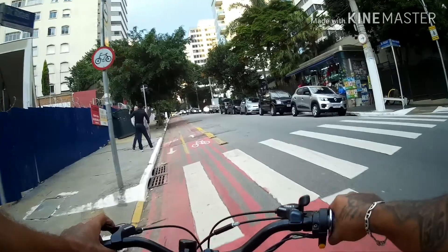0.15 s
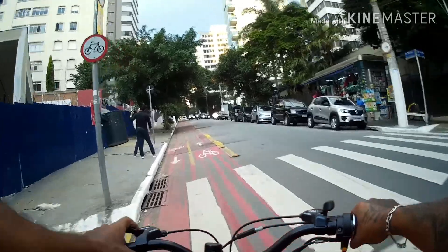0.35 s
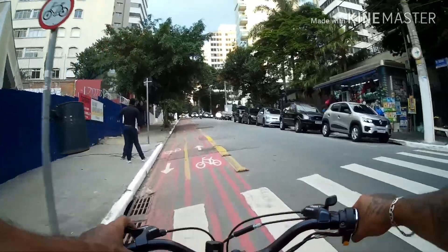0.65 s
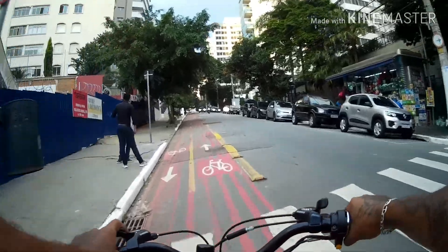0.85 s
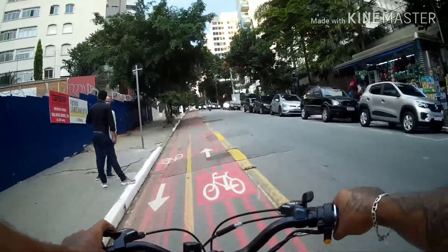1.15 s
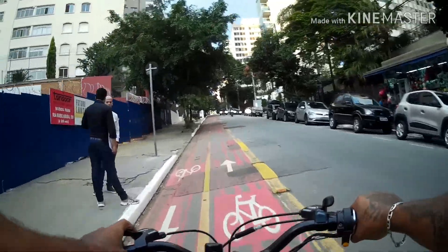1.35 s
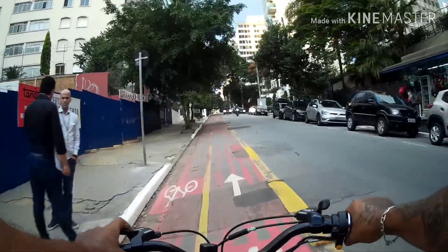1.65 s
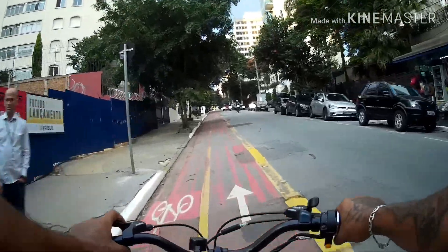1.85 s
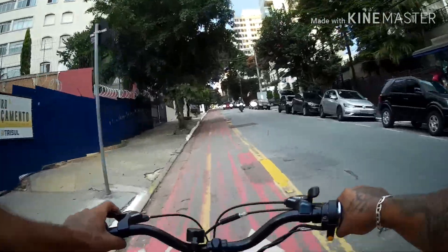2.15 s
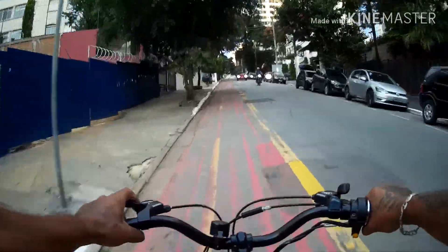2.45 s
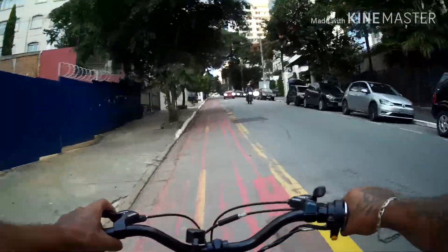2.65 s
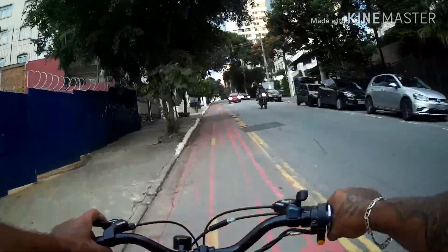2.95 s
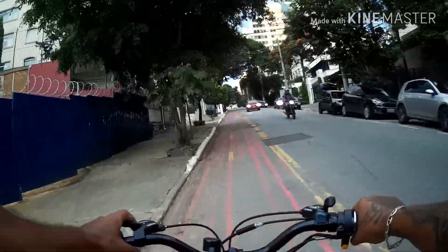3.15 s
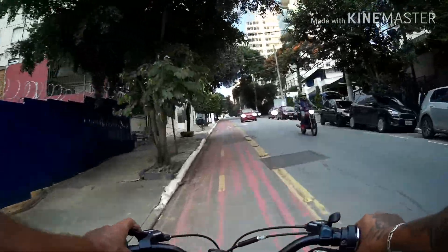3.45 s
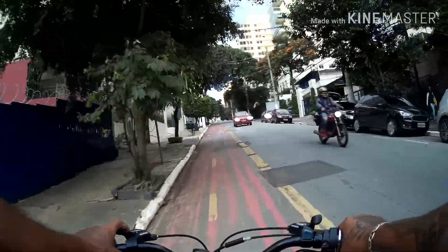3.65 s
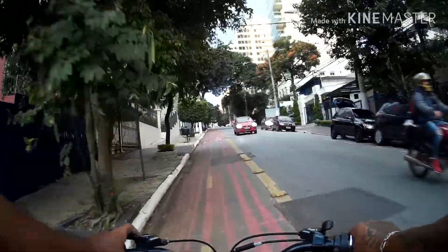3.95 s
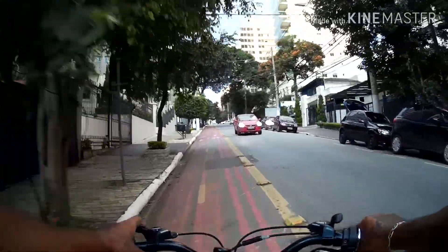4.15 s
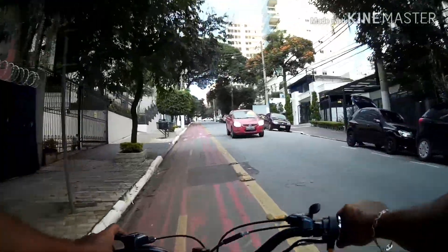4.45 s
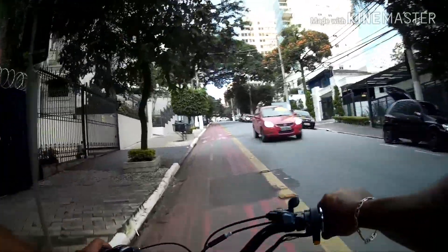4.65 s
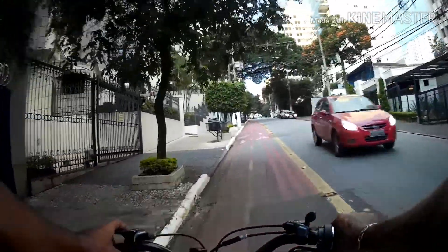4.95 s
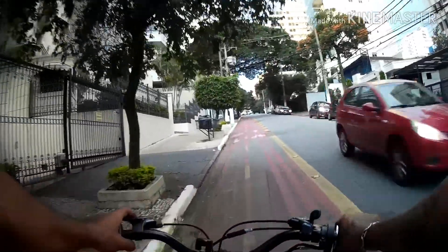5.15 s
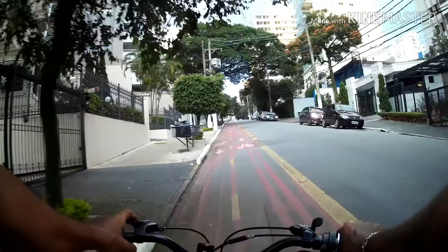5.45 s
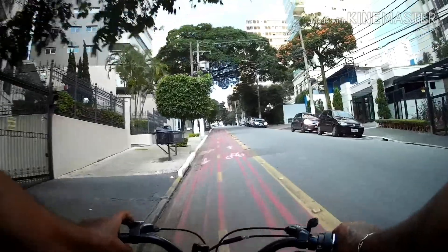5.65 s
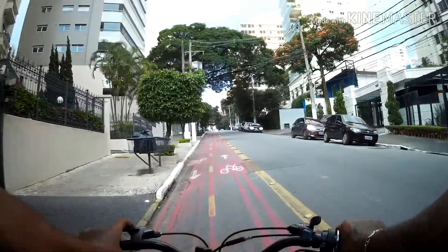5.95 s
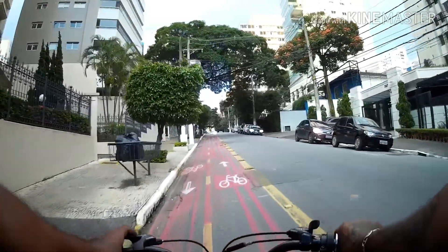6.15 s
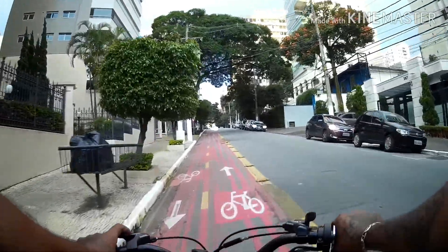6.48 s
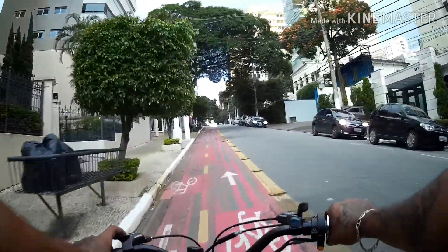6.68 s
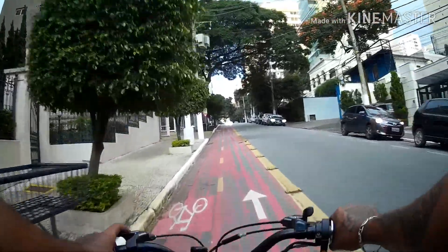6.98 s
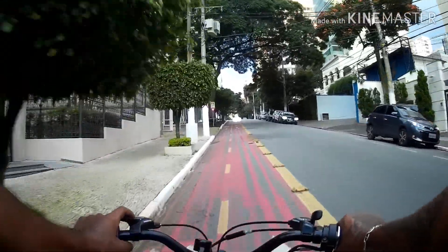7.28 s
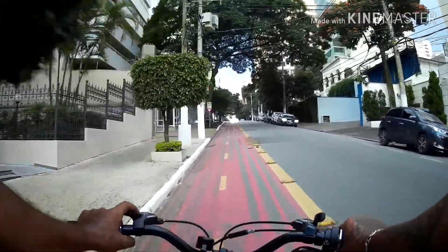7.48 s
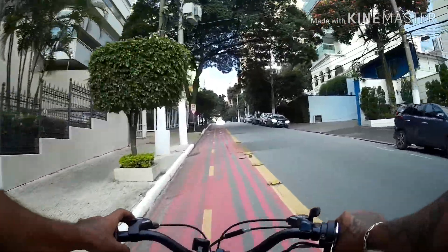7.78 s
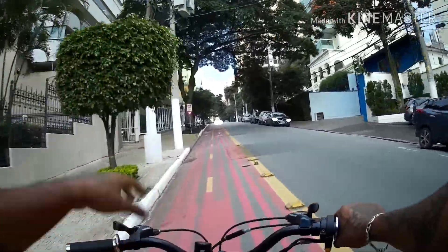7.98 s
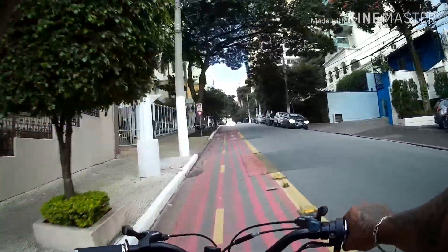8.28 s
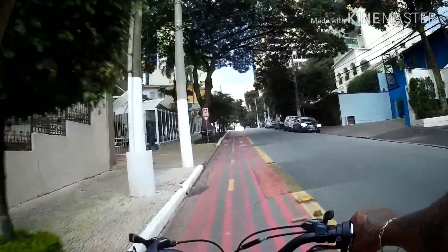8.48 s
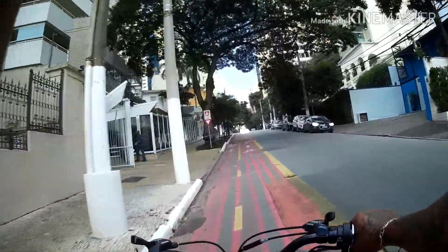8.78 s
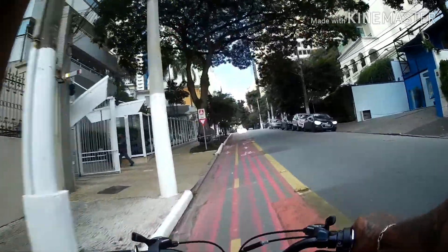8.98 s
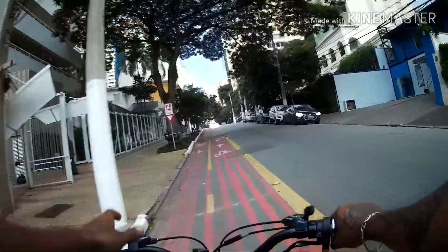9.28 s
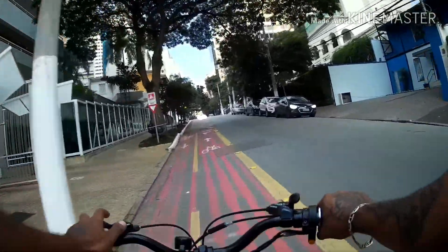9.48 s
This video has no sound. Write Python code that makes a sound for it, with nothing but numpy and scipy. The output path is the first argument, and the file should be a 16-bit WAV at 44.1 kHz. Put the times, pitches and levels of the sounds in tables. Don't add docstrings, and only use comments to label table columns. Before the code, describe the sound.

A small four-stroke engine on a bicycle drones close by, low and throaty with a hollow muffler ring. It speeds up over five seconds, then holds nearly steady. Rough road shakes the chain guard and loose metal in irregular bursts. A motorcycle hums past near four seconds, a car soon after. Wind bumps the single encased microphone, leaving treble dull.

```python
import sys
import numpy as np
from scipy import signal
from scipy.fft import rfft, irfft, next_fast_len
from scipy.io import wavfile
from scipy.ndimage import uniform_filter1d

SR = 44100
rng = np.random.default_rng(int(sys.argv[2]) if len(sys.argv) > 2 else 0)


def generate_wav(sig):
    pcm = np.round(np.clip(np.atleast_2d(sig).T, -1, 1) * 32767).astype(np.int16)
    wavfile.write(sys.argv[1], SR, pcm)


def elevation(decibels):
    levels = np.asarray(decibels, float)
    return 10 ** (levels / 20)


N = 424241


def evened(x):
    return x / np.sqrt(np.mean(x ** 2) + 1e-20)


def steadied(x):
    return x / np.sqrt(uniform_filter1d(x ** 2, size=12000, mode="mirror") + 1e-12)


def curve(rows):
    s, *columns = np.transpose(rows)
    return [np.interp(np.arange(N) / SR, s, column) for column in columns]


def bell(s, length):
    return np.exp(-8 * ((np.arange(N) / SR - s) / length) ** 2)


def gate(turns, place, width):
    from_place = (turns - place + .5) % 1 - .5
    return np.exp(-8 * (from_place / width) ** 2)


def coloured(points):
    f, db = np.transpose(points)
    size = next_fast_len(N)
    hz = np.fft.rfftfreq(size, 1 / SR)
    shape = elevation(np.interp(np.log(hz + 1), np.log(f + 1), db, -90, -90))
    return evened(irfft(rfft(rng.standard_normal(size)) * shape, size)[:N])


def resonate(x, hz, width):
    return signal.lfilter(*signal.iirpeak(hz, hz / width, SR), x)


def engine():
    # (time [s], level [dB])
    effort_rows = [(0.0, -37), (0.02, -35), (0.1, -37.5), (0.27, -34.5), (0.51, -42), (1.12, -41),
                   (1.45, -35), (1.95, -34), (3.51, -32), (3.72, -35), (3.8, -32), (4.88, -31),
                   (5.44, -32.5), (5.63, -29.5), (6.24, -34), (6.54, -30.5), (9.38, -31), (9.62, -30)]
    # (time [s], breathing level [dB])
    throttle = [(0, -34), (.15, -30.5), (.7, -33), (1.3, -32), (2.12, -30.5), (2.6, -32), (2.89, -32.5),
                (3.72, -36), (3.8, -34), (4.5, -32.5), (4.63, -30), (5.4, -30), (6.2, -30), (7.4, -28),
                (8.8, -28.5), (9.62, -29)]
    # (time [s], length [s], chain rattle rise [dB], clatter rise [dB])
    rough = [(.0, 0.16, 3, -4), (0.392, 1, 6, 3), (.85, 0.36, 3, -3), (1.358, 0.46, 11, 0),
             (1.85, 0.42, 2, -1.5), (2.3, .4, 9.5, -2.5), (2.715, 0.33, 14, 2.5), (2.89, 0.23, 7.5, 6),
             (3.147, 0.66, 15, 1), (3.437, 0.25, 4, 6.5), (3.583, 0.36, 11.5, 2), (4.025, 0.74, 15.5, 5),
             (4.4, 0.37, 8.5, 0), (4.806, 0.77, 15.5, 7), (5.162, 0.54, 0, 1.5), (5.634, 0.36, -9, 3.5),
             (5.807, 0.46, 5, 2.5), (6.577, 0.35, 8, 1.5), (6.96, 0.74, 6, -1.5), (7.434, 0.36, 5, 4),
             (7.714, 0.58, 9.5, 1.5), (7.983, 0.15, 11, -7), (8.22, 0.5, 10.5, 5.5), (8.857, 0.41, 9, 6),
             (9.2, 0.5, 5, 3), (9.6, 0.35, 0, 2)]
    turns, faster = crank()
    ring_db = curve(effort_rows)[0]
    effort = ring_db + 31
    chain, shake = sum(np.outer(rises, bell(s, length)) for s, length, *rises in rough)
    ring_db = ring_db + 0.29 * shake
    breath_db = curve(throttle)[0] + 0.13 * shake
    rattle_db = -55.5 + 0.098 * effort + chain
    clatter_db = -54 + 0.34 * effort + shake
    flow_db = (breath_db + ring_db) / 2 - 6.2 + .12 * faster
    bumps = elevation(1.6 * coloured([(2, -12), (4, 2), (10, -2), (25, -12)]))
    gas = elevation(breath_db + 6.0) * breath(turns, faster) + elevation(flow_db) * roar(turns)
    shell = elevation(ring_db + 0.66) * cans(turns, faster)
    loose = elevation(rattle_db - 4.5) * rattle(turns) + elevation(clatter_db - 6.5) * clatter(turns)
    return gas + shell + loose * bumps


def crank():
    # (time [s], engine speed [cycles/s])
    pace = [(0.0, 29.648), (0.6, 29.818), (1.2, 30.192), (1.8, 31.014), (2.4, 31.53), (3.0, 33.54),
            (3.6, 34.458), (4.2, 35.73), (4.9, 36.337), (5.6, 37.249), (6.2, 36.833), (6.9, 36.856),
            (7.5, 37.507), (8.3, 37.336), (9.0, 37.842), (9.62, 37.006)]
    # (time [s], length [s], lead [cycles])
    lurches = [(0.22, 0.25, -0.053), (0.7, 0.25, 0.14), (1.4, 0.25, 0.044), (2.18, 0.25, 0.181),
               (2.48, 0.25, -0.09), (3.4, 0.25, -0.036), (3.6, 0.25, 0.032), (4.42, 0.25, -0.066),
               (4.58, 0.25, -0.124), (5.1, 0.25, 0.06), (5.4, 0.35, -0.06), (8.6, 0.25, 0.034),
               (8.88, 0.25, 0.067), (9.34, 0.25, -0.071)]
    speed = curve(pace)[0]
    turns = .27 + np.cumsum(speed) / SR
    turns = turns + sum(lead * bell(s, length) for s, length, lead in lurches)
    flutter = .003 * coloured([(2, -10), (4, 0), (8, -4), (14, -30)])
    return turns + flutter, speed - 37


def breath(turns, faster):
    # (place [cycle], width [cycles], size [minus = suction], growth [dB per cycle/s])
    swings = [(-0.064, 0.08, -0.104, -1.0), (-0.319, 0.782, -0.184, -0.5), (0.637, 0.335, -0.027, -1.8),
              (0.204, 0.674, -0.166, -0.9)]
    # (place [cycle], frequency [Hz], t60 [s], size [ratio], growth [dB per cycle/s])
    pipe = [(-0.217, 138.0, 0.2, -0.0019, -4.0), (-0.228, 196.0, 0.017, 0.121, 4.0),
            (0.136, 189.0, 0.138, -0.0253, -0.9), (-0.07, 271.0, 0.156, 0.0094, 3.7),
            (0.371, 259.0, 0.071, -0.002, -4.0)]
    strokes = sum(size * elevation(db * faster) * gate(turns, place, width) for place, width, size, db in swings)
    ringing = rings(turns, faster, pipe, uneven_db=.5, slide_db=.6, wander=.00004)
    return steadied(strokes - strokes.mean() + ringing)


def cans(turns, faster):
    # (place [cycle], frequency [Hz], t60 [s], size [ratio], growth [dB per cycle/s])
    can_rings = [(-0.036, 677.0, 0.012, 0.0676, 0.5), (0.102, 490.0, 0.127, -0.0159, 1.4),
                 (-0.066, 474.0, 0.024, 0.0972, 0.7), (-0.464, 532.0, 0.056, -0.0331, 1.8),
                 (0.238, 345.0, 0.051, -0.0263, 1.1), (-0.014, 702.0, 0.037, -0.0374, 4.0),
                 (0.39, 426.0, 0.104, 0.0031, -1.5), (-0.314, 688.0, 0.2, -0.0119, 3.7),
                 (-0.07, 621.0, 0.2, 0.0027, 1.1), (-0.058, 719.0, 0.025, 0.0838, 2.2)]
    teeth = 13
    mesh = .0093 * elevation(.6 * faster) * np.cos(2 * np.pi * teeth * (turns - .029))
    ringing = rings(turns, faster, can_rings, uneven_db=1.3, slide_db=.9, wander=.00003)
    case = signal.butter(4, 850, fs=SR, output="sos")
    return signal.sosfiltfilt(case, steadied(mesh + ringing))


def rings(turns, faster, table, uneven_db, slide_db, wander):
    out, t = np.zeros(N), np.arange(6000) / SR
    chance = rng.standard_normal((400, 2))
    for place, hz, t60, size, growth_db in table:
        at = np.flatnonzero(np.diff(np.floor(turns - place)))
        late, strong = chance[np.round(turns[at]).astype(int)].T
        drift_db = slide_db * evened(uniform_filter1d(rng.standard_normal(400), size=7))[:len(at)]
        moment = np.clip(at + np.round(wander * SR * late).astype(int), 0, N - 1)
        train = np.zeros(N)
        train[moment] = elevation(uneven_db * strong + drift_db + growth_db * faster[at])
        onset = 1 - np.exp(-t / .0004)
        ring = size * np.sin(2 * np.pi * hz * t) * elevation(-60 * t / t60) * onset
        out += signal.oaconvolve(train, ring)[:N]
    return out


def roar(turns):
    # (frequency [Hz], density [dB per Hz])
    roar_spectrum = [(25, 1), (55, -8), (280, 1), (380, -2.5), (700, -2), (1100, -13), (2000, -23),
                     (4000, -48)]
    return coloured(roar_spectrum) * (1 + 0.06 * gate(turns, .02, 0.98))


def rattle(turns):
    # (frequency [Hz], width [Hz], level [dB])
    guard = [(1214, 43, 3), (1152, 244, 3.5), (1290, 54, -11)]
    jolts = rng.standard_normal(N) * (3.2 + gate(3 * turns, 0.21, 1.0))
    return evened(sum(elevation(db) * resonate(resonate(jolts, hz, w), hz, 2.6 * w) for hz, w, db in guard))


def clatter(turns):
    # (frequency [Hz], width [Hz], level [dB])
    fins = [(1755, 19, -11.5), (1825, 300, 0), (2366, 420, -5.5), (3750, 55, -39.5), (4100, 100, -20),
            (4206, 80, -21.5)]
    # (frequency [Hz], density [dB per Hz])
    leak = [(2500, -12), (3500, 4), (6000, 6.5), (12000, 0), (14500, -18)]
    taps = rng.standard_normal(N) * (0.74 + 0.37 * gate(turns, 0.29, 0.4) + 1.4 * gate(turns, 0.723, 0.33))
    hardness = np.minimum(rng.exponential(1, N // 64 + 1), 3.5)
    taps *= elevation(2.0 * hardness).repeat(64)[:N]
    ringing = sum(elevation(db) * evened(resonate(resonate(taps, hz, w), hz, 0.89 * w)) for hz, w, db in fins)
    return evened(ringing) + elevation(-14.5) * coloured(leak)


def passers():
    # (time [s], firing rate [Hz], level [dB])
    vehicles = [
        [(3.6, 111.3, -58.5), (3.85, 107.6, -39), (4.05, 106, -43), (4.2, 101, -41), (4.6, 98, -68)],
        [(4.9, 63.65, -45), (5.25, 62.9, -33), (5.5, 59.6, -35), (5.7, 58, -33), (6, 58.7, -38.5),
         (6.5, 57.7, -57), (6.9, 59, -55)],
    ]
    out = np.zeros(N)
    for rows in vehicles:
        hz, level_db = curve(rows)
        turn = 2 * np.pi * np.cumsum(hz) / SR
        hum = np.sin(turn) + 0.33 * np.sin(2 * turn + 1) + 0.11 * np.sin(3 * turn + 2)
        wash = coloured([(60, -22.0), (150, -1.0), (300, 10), (700, 0), (1500, -10), (3000, -34.0)])
        heard = (level_db > -59.9) * elevation(level_db)
        out += heard * (evened(hum) + 0.67 * wash)
    return out


def buzzes():
    # (time [s], frequency [Hz], length [s], level [dB])
    tones = [(1.38, 548, .16, -42), (1.47, 400, .2, -38), (1.75, 385, .25, -44), (.65, 780, .15, -50),
             (2.6, 300, .4, -44), (4.75, 335, .25, -42), (5.28, 290, .2, -40), (8.6, 265, .5, -42),
             (3.2, 400, .8, -43), (8.82, 42, .2, -37), (9.12, 33, .2, -36), (6.7, 4255, 2.4, -79.5)]
    shake = rng.standard_normal(N)
    return sum(elevation(db) * steadied(resonate(resonate(shake, hz, 2.3), hz, 21.0)) * bell(s, length)
               for s, hz, length, db in tones)


def wind():
    # (time [s], length [s], rise [dB])
    gusts = [(.0, 0.3, 20.5), (.65, 1, 16), (1.65, .35, 20.5), (2.45, 1.0, 19), (3.35, 0.63, 10),
             (4.0, 1, 18.5), (4.95, .3, 6), (5.45, .8, 18), (6.85, .6, 2), (7.7, 0.83, 19), (8.3, 0.87, 19),
             (9.25, .55, 21)]
    lumps = elevation(1.9 * coloured([(1, -10), (6, 6), (20, -43)]))
    rumble = coloured([(8, 3.0), (20, -9), (40, -18.0), (70, -20.0), (200, -23)])
    level_db = -51 + 1.5 + sum(db * bell(s, length) for s, length, db in gusts)
    return elevation(level_db) * evened(lumps * rumble)


def scene():
    return (engine() + passers() + buzzes() + wind())[None]


def low_pass(x):
    return signal.sosfilt(signal.butter(12, 15460, fs=SR, output="sos"), x)


def record(dry):
    # (frequency [Hz], density [dB per Hz])
    hiss = [(2000, -6), (3300, 0), (5000, -0.5), (9000, -2.5), (12000, -1), (13500, -4.5), (14800, -13),
            (15500, -24)]
    x = signal.sosfilt(signal.butter(1, 18, "high", fs=SR, output="sos"), dry)
    loudness = np.sqrt(abs(uniform_filter1d(x ** 2, 300)))
    x = x + elevation(-65.5) * coloured(hiss) * (0.83 + 2.8 * loudness)
    return low_pass(x)


dry = scene()
out = record(dry)
generate_wav(out)
```